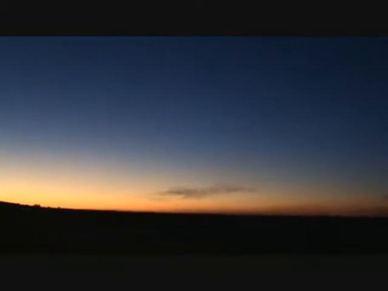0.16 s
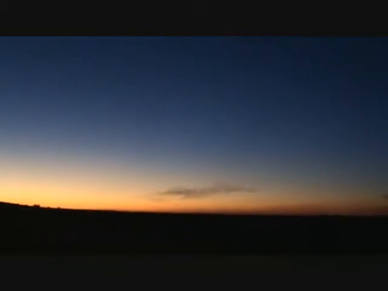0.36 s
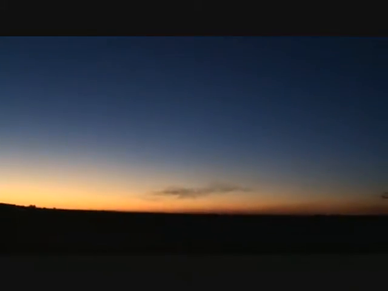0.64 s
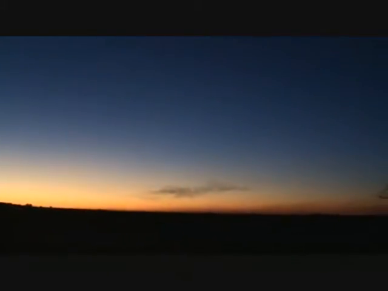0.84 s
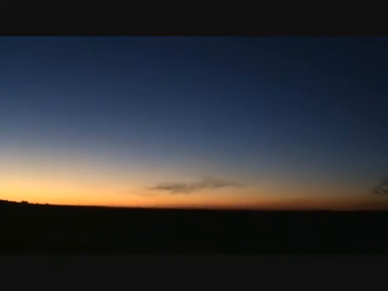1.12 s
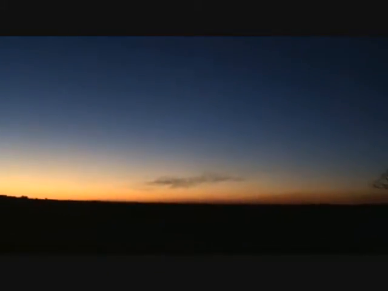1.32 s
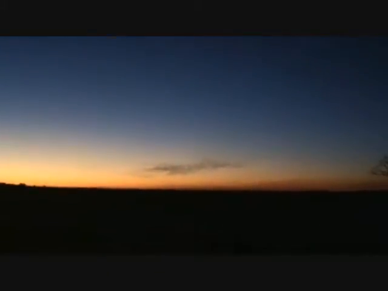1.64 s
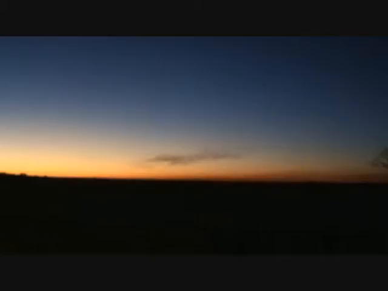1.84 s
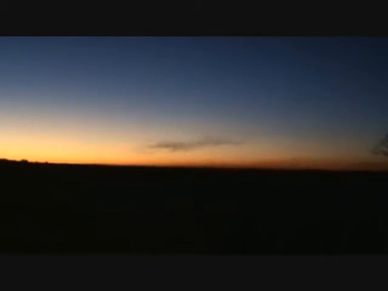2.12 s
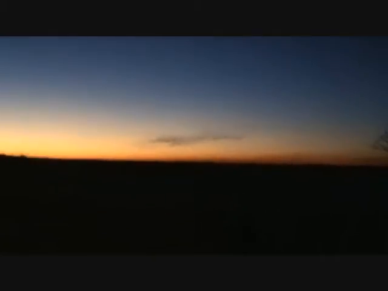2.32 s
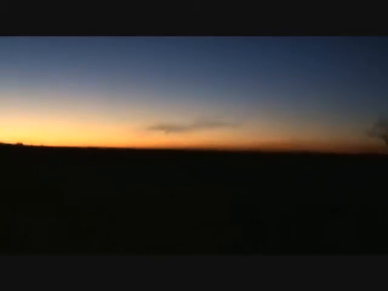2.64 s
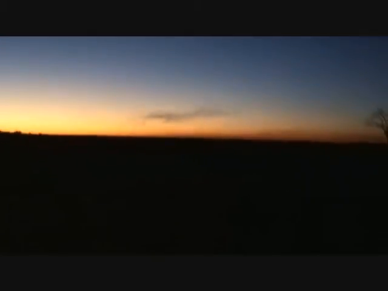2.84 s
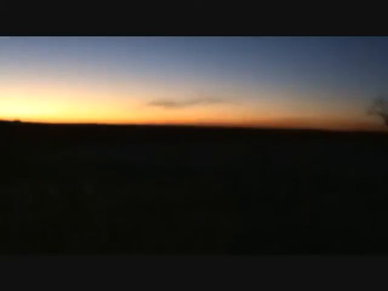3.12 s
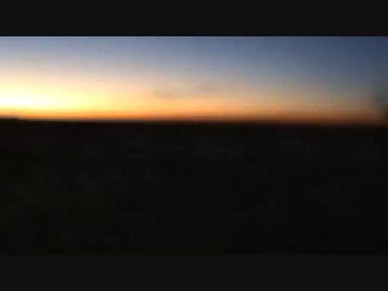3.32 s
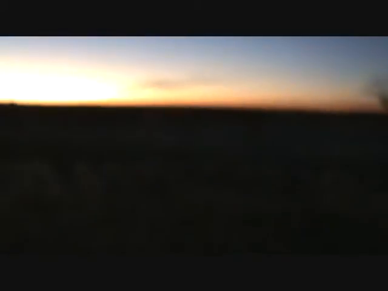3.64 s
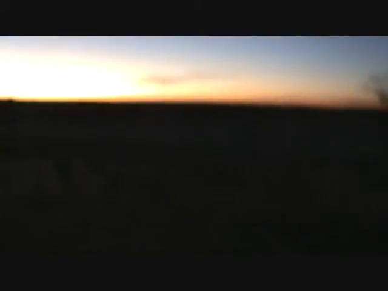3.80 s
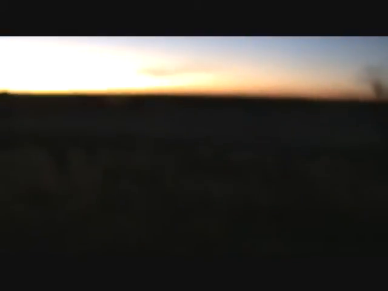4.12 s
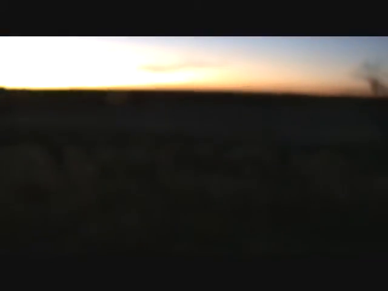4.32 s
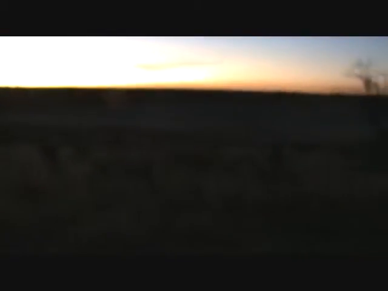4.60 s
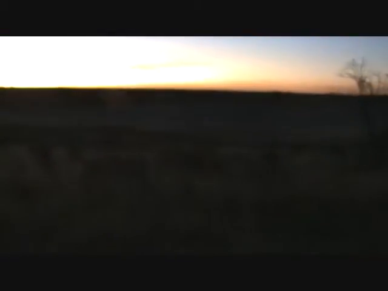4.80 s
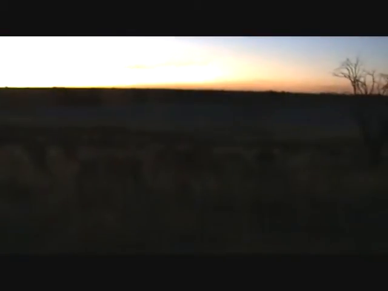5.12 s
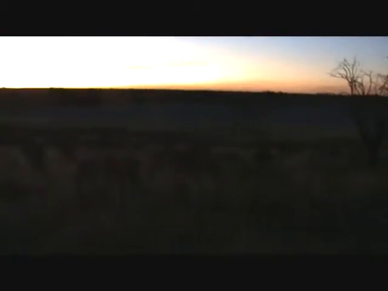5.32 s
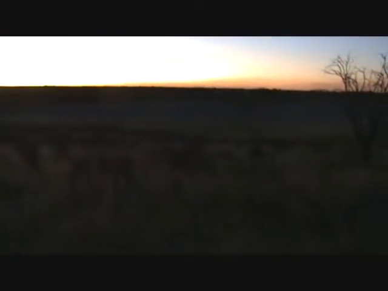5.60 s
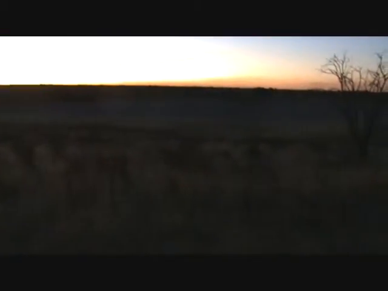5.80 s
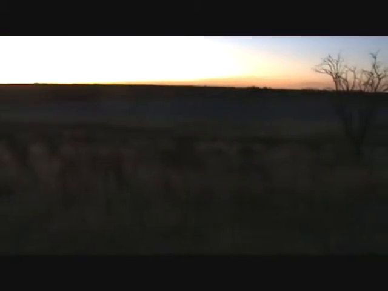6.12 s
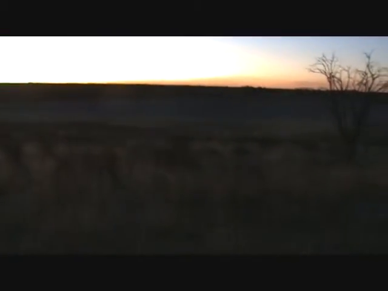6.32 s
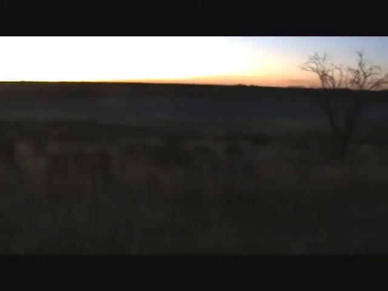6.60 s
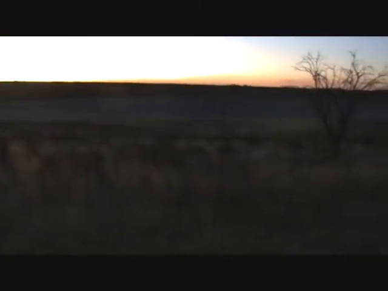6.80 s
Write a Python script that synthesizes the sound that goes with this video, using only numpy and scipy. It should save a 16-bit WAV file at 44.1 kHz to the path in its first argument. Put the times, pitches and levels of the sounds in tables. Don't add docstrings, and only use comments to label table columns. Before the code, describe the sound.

Dry, hard clicking barks of several geckos repeat at about five per second, near and far, with thin crickets, soft air and small camera handling bumps.

```python
import sys
import numpy as np
from scipy import signal
from scipy.fft import rfft, irfft
from scipy.io import wavfile
from scipy.ndimage import uniform_filter1d

SR = 44100
rng = np.random.default_rng(int(sys.argv[2]) if len(sys.argv) > 2 else 0)


def how_loud(loudness_db):
    steps = np.asarray(loudness_db, float) / 20
    return 10 ** steps


def wav_out(sig):
    wavfile.write(sys.argv[1], SR, np.round(np.clip(np.atleast_2d(sig).T, -1, 1) * 32767).astype(np.int16))


N = 306495
SIZE = 8192
HZ = np.fft.rfftfreq(SIZE, 1 / SR)
SCENE_HZ = np.fft.rfftfreq(N, 1 / SR)
T = np.arange(N) / SR
CASE_PAN_DB = 0.5


def on_log_hz(table, hz):
    table_hz, values = np.transpose(table)
    return np.interp(np.log(hz + 1), np.log(table_hz), values)


def level(x, db):
    return x * how_loud(db) / np.sqrt(np.mean(x ** 2))


def pan(db):
    return how_loud(np.array([[db], [-db]]) / 2)


def walk(rate_hz):
    k = int(SR / rate_hz)
    steps = np.repeat(rng.standard_normal(N // k + 1), k)
    return 1.4 * uniform_filter1d(uniform_filter1d(steps, k), k)[:N]


def swells(rows):
    return sum(db * np.exp(-((T - s) / half_s) ** 2) for s, half_s, db in rows)


def resonances(modes, hz):
    s = 1j * hz
    return sum(how_loud(db) * w * s / (f * f + w * s + s * s) for f, w, db in modes)


def add(out, sound, start_s):
    i = int(start_s * SR)
    trimmed = sound * (np.arange(SIZE) < SIZE - 400)
    out[:, i:i + SIZE] += trimmed[:, :N - i]


# f/Hz, density/dB
AIR = [(24, -17.5), (32, -15.5), (60, -7), (250, -6), (430, -4), (680, -9), (1000, -5), (1600, -8),
       (2600, -11.5), (5000, -20.5), (7000, -16.5), (10000, -21), (15800, -24), (16300, -58.5)]
# f/Hz, correlation/1
AIR_ALIKE = [(30, 0.9), (60, 0.997), (125, 0.792), (300, 0.758), (500, -0.014), (1000, -0.233),
             (3000, -0.15), (8000, 0.11), (12000, 0.39), (16000, 1)]
# middle t/s, half length/s, rise/dB
GUSTS = [(1.04, 0.129, 3.5), (2.198, 0.338, 4.5), (2.877, 0.2, 2), (4.72, 0.106, 3.5), (5.15, 0.11, 4),
         (3.406, 0.18, 2), (4.083, 0.217, 3.5), (2.578, 0.099, 3), (6.65, 0.06, 3.5), (0.784, 0.071, 2)]
# t/s, rise/dB
BRUSHES = [
    (3.25, 5),
    (3.39, 7.5),
    (4.49, 7),
    (5.44, 8),
    (6.04, 6.5),
    (6.29, 2),
]


def air():
    alike = np.clip(on_log_hz(AIR_ALIKE, SCENE_HZ), -.5, .999)
    noise = rfft(rng.standard_normal((2, N))) * how_loud(on_log_hz(AIR, SCENE_HZ))
    mid, side = noise * np.sqrt([1 + alike, 1 - alike])
    both = np.array([mid + side, mid - side])
    low = 1 / (1 + (SCENE_HZ / 750) ** 4) / (1 + (60 / (SCENE_HZ + 1)) ** 4)
    brush_s = 0.035
    brushes_db = swells([(s, brush_s, db) for s, db in BRUSHES])
    gusts = how_loud(swells(GUSTS) + brushes_db - 2.0 + walk(20))
    return level(irfft(both * low, N) * gusts + irfft(both * (1 - low), N), -54)


# f/Hz, rms level/dB
HUM = [
    (32.3, -75),
    (107.7, -77),
    (1239.5, -68),
    (15625, -86),
]


def hum():
    tones = sum(np.sqrt(2) * how_loud(db + 2.0 * walk(6.5)) * np.sin(2 * np.pi * f * T) for f, db in HUM)
    return tones * pan(CASE_PAN_DB)


CRICKET_SONGS = [
    (8070, 134.7),
    (7850, 126.8),
]
# middle t/s, half length/s, rise/dB
HIGH_SWELLS = [(0.0, 0.93, 9.5), (1.33, 0.32, 13.5), (3.0, 0.197, 9), (3.52, 0.433, 15.5),
               (4.37, 0.435, 16.5), (5.6, 0.23, 14.5), (6.75, 0.57, 13)]
LOW_SWELLS = [(0.3, 0.5, 4.1), (1.45, 0.8, 11.4), (3.15, 0.2, 7.9), (4.4, 0.47, 9.6), (5.5, 0.653, 12.75),
              (6.8, 0.86, 11)]
SOFT_TRILL_DB = [-77.5, -75.5]


def crickets():
    out = 0
    for k, (wing_hz, rate_hz) in enumerate(CRICKET_SONGS):
        stroke = np.cumsum(rate_hz * (1 + .002 * walk(3))) / SR
        burst = np.exp(-((stroke % 1 - .5) / .2) ** 2) * how_loud(1.2 * walk(120))
        wing = 2 * np.pi * np.cumsum(wing_hz * (1 + 0.012 * walk(300))) / SR
        trill_db = SOFT_TRILL_DB[k] + swells((HIGH_SWELLS, LOW_SWELLS)[k]) - 3.0
        out = out + pan(1.5 - 1.1 * k) * level(burst * np.sin(wing), 0) * how_loud(trill_db)
    return out


def throat_ring(throat, stretch=1):
    colour_db = uniform_filter1d(on_log_hz(throat, HZ / stretch), size=20)
    cepstrum = irfft(np.log(how_loud(colour_db)))
    cepstrum[1:SIZE // 2] *= 2
    cepstrum[SIZE // 2 + 1:] = 0
    ring = np.exp(rfft(cepstrum))
    return ring / np.abs(signal.hilbert(irfft(ring))).max()


def breathy(ring, puff_ms=8.5, hiss_hz=7800, hiss_db=2.5):
    puff = rng.standard_normal(SIZE) * np.exp(-np.arange(SIZE) / SR * 1000 / puff_ms)
    high = 1 / (1 + (hiss_hz / (HZ + 1)) ** 8)
    hiss = how_loud(hiss_db) * rfft(puff) / np.sqrt(np.sum(puff ** 2))
    return ring * (1 - high + high * hiss)


def grass(scatter_db, t60_s, late_db=-20, late_t60_s=0.142, apart=0.776, rise_s=0.0085):
    t = np.arange(SIZE) / SR
    rise = 1 - np.exp(-(t / rise_s) ** 2)
    fall = how_loud(-60 * t / t60_s) + how_loud(late_db - 60 * t / late_t60_s)
    noise = rng.standard_normal((3, SIZE))
    echoes = (noise[0] + apart * noise[1:]) * rise * fall * (t < .13)
    return 1 + how_loud(scatter_db) * rfft(echoes) * resonances([(3700, 130000, 0.0096)], HZ)


def ports(pan_db):
    lag_us_per_db = 2
    lead_s = np.array([[1], [-1]]) * pan_db * lag_us_per_db / 2e6
    grille = 1 - 2 * resonances([(4400, 4200, 0)], HZ)
    return grille * pan(pan_db) * np.exp(2j * np.pi * HZ * lead_s)


def bark(peak_db, gaps_ms, fade_ms, ring, path, jitter, dulling_db=0.45, bloom_db=0.1019, loose_from=0):
    gap_chance, size_chance = rng.standard_normal((2, len(gaps_ms) + 1))
    looseness = jitter * np.linspace(loose_from, 1, len(gaps_ms))
    ms = np.r_[0, np.cumsum(gaps_ms * (1 + looseness * gap_chance[1:]))]
    fade_squareness = 2.27
    size = np.exp(-(ms / fade_ms) ** fade_squareness) * how_loud(.6 * size_chance)
    khz = HZ / 1000 - 4
    tilt_db = -dulling_db * np.maximum(khz, 0) + bloom_db * np.maximum(-khz, 0)
    colour = how_loud(np.outer(ms, tilt_db))
    clicks = size @ (colour * np.exp(-2j * np.pi * np.outer(ms / 1000, HZ)))
    heard = clicks * breathy(ring) * path
    effort = np.linalg.norm(ring) * np.linalg.norm(size)
    return how_loud(peak_db) * irfft(heard) * effort / np.linalg.norm(heard.mean(axis=0))


# f/Hz, level/dB
FAR_THROAT = [(400, -65), (1500, -16), (2200, -14), (3000, -11), (4000, 0), (5000, -10.5), (6000, -20.5),
              (7500, -31), (16000, -84.5)]


def far_bark(db, hz, pan_db, gap_ms, fade_ms, scatter_db, narrowing):
    throat = [(f, narrowing * colour_db) for f, colour_db in FAR_THROAT]
    ring = throat_ring(throat, hz / 4000)
    path = grass(scatter_db, 0.086, rise_s=0.00416) * ports(pan_db)
    return bark(db, np.full(14, gap_ms), fade_ms, ring, path, jitter=.16, loose_from=0.59)


# t/s, level/dB
CHORUS_DB = [(0.0, -56), (0.71, -59), (1.55, -52.5), (2.63, -56.5), (3.58, -55.5), (3.95, -58),
             (4.8, -60.5), (4.99, -49.5), (5.28, -59), (5.4, -57), (6.35, -60), (6.52, -49.5), (6.95, -56)]


def chorus():
    out = np.zeros((2, N))
    barks_per_s = 220
    voices = [far_bark(0, 3800 + 900 * a, 12 * side - 6, 2.1 + b, 28.1, -1.6, 0.985)
              for a, b, side in rng.random((40, 3))]
    for k, (when, size) in enumerate(rng.random((int(barks_per_s * N / SR), 2))):
        add(out, how_loud(3.9 * size) * voices[k % 40], when * N / SR)
    t_s, db = np.transpose(CHORUS_DB)
    return level(out, 0) * how_loud(np.interp(T, t_s, db) + 0.41)


# f/Hz, width/Hz, rms level/dB
TICK_RING = [
    (721, 93, -77.5),
    (1032.4, 143, -65.5),
    (1204, 223, -72),
]


def motor():
    tick_rate_hz, left_db = 33.5, 5.5
    ticks = np.zeros(N)
    at = (np.arange(.012, N / SR - .01, 1 / tick_rate_hz) * SR).astype(int)
    ticks[at] = how_loud(0.5 * rng.standard_normal(len(at)))
    struck = rfft(ticks)
    rings = sum(level(irfft(struck * resonances([(f, w, 0)], SCENE_HZ) ** 2, N), db) for f, w, db in TICK_RING)
    return rings * pan(left_db + CASE_PAN_DB)


# (t/s, peak/dB)
FAR_BOUTS = [
    ((4295, -3, 2.2, 32), [(0.161, -33), (0.4025, -37)]),
    ((4220, 3.9, 2.85, 30.6), [(0.6205, -38), (0.8435, -40), (1.0505, -37.5), (1.284, -41.5), (1.5094, -42), (1.7524, -43)]),
    ((4170, 5.6, 2.52, 19), [(0.0248, -54), (0.7194, -38.5), (0.945, -34), (1.1687, -41)]),
    ((4280, -4.5, 3, 15), [(1.8233, -26.5), (2.0276, -28), (2.2583, -28.5), (2.5172, -29)]),
    ((4490, 3.4, 2.16, 9.6), [(1.9325, -29.5), (2.1974, -27.5), (2.4603, -29.5), (2.7621, -29.5)]),
    ((3837.5, -2.5, 2, 29.5), [(1.8494, -37), (2.0894, -41.5), (2.3351, -41), (2.5855, -43), (2.835, -38.5), (3.0809, -42)]),
             ((4210, 5.1, 2.49, 3.15), [(2.9871, -28.5), (3.1517, -29.5), (3.3233, -30), (3.494, -28.5), (3.6735, -29.5), (3.8487, -46.5), (4.0168, -30)]),
    ((4840, 3, 2.49, 14.1), [(2.9507, -39.5), (3.189, -42), (3.3887, -37), (3.6351, -38), (3.7094, -41.5), (3.8866, -37), (4.145, -43), (4.1739, -37), (4.4328, -44)]),
    ((3870, 3.6, 2.86, 8.9), [(3.2939, -44), (3.375, -42), (3.465, -41.5), (3.5748, -37), (3.745, -37), (3.7933, -40), (3.9774, -41)]),
    ((4328.5, -2.5, 2.5, 22), [(4.2438, -32), (4.4648, -32), (4.6902, -34), (4.897, -35.5)]),
    ((4900.5, -1.5, 1.5, 15), [(4.555, -32), (4.803, -35), (5.0844, -33), (5.5344, -43)]),
             ((4070, 0.46, 2.57, 7), [(4.7594, -28), (4.9621, -24.5), (5.1654, -27), (5.1911, -23), (5.422, -20.5), (5.6027, -36.5)]),
    ((3897, -3.5, 5, 1.5), [(5.2894, -29.5), (5.4894, -28), (5.7094, -58), (5.8994, -46)]),
    ((4250.5, -4, 1, 34.5), [(6.3844, -36.5), (6.5994, -40), (6.8164, -40.5)]),
    ((4220, 0.5, 1, 32.5), [(6.4298, -36), (6.6328, -36.5), (6.8372, -35)]),
    ((4300, 6.8, 1.4, 12.4), [(6.1615, -32.5), (6.4024, -32), (6.653, -33), (6.9027, -32.5)]),
]


def distant():
    out = np.zeros((2, N))
    for (hz, pan_db, gap_ms, fade_ms), barks in FAR_BOUTS:
        for s, db in barks:
            narrowing = np.clip(.9 - 0.074 * (db + 30.5), .7, 1.6)
            add(out, far_bark(db + 0.9, hz, pan_db, gap_ms, fade_ms, -19.5, narrowing), s)
    return out


def burrow(late_ms, echo_db):
    delay = np.exp(-2j * np.pi * HZ * late_ms / 1000)
    return 1 + how_loud(echo_db) * resonances([(3200, 8400, 0.0014)], HZ) * delay


# t/s, peak/dB, first click gap/ms, second gap/ms, later gaps/ms
AHEAD = [(0.2332, -11.1, 2.49, 2.72, 2.31), (0.4388, -11.9, 3.22, 3.27, 2.57),
         (0.654, -11.8, 3.11, 3.11, 2.62), (0.8721, -11.3, 3.13, 3.13, 2.62),
         (1.0934, -12.0, 3.11, 3.06, 2.65), (1.3301, -12.2, 3.06, 3.06, 2.62),
         (1.5978, -12.6, 3.11, 3.06, 2.56)]
LEFT = [(5.0257, -10.0, 1.6, 1.85, 2.07), (5.2317, -10.7, 2.09, 2.8, 2.62),
        (5.432, -10.8, 2.54, 2.72, 2.62), (5.6362, -10.8, 2.4, 3.2, 2.72), (5.8386, -11.0, 2.36, 3.1, 2.7),
        (6.0408, -11.0, 2.45, 3.12, 2.75), (6.2528, -10.9, 2.4, 3.13, 2.74),
        (6.4798, -10.9, 2.38, 3.08, 2.65)]
MIDDLE = [(4.3104, -21.7, 1.54, 1.77, 1.77), (4.5111, -20.9, 1.8, 1.95, 1.92),
          (4.7127, -20.7, 1.97, 2.15, 2.05), (4.9182, -20.8, 1.99, 2.15, 2.06),
          (5.129, -22.9, 2.02, 2.18, 2.06), (5.3566, -21.9, 2.0, 2.15, 2.08)]
RIGHT_FAR = [(1.4355, -32.9, 1.63, 1.81, 1.87), (1.6629, -31.0, 1.88, 2.15, 2.16),
             (1.891, -30.8, 2.02, 2.31, 2.32), (2.1267, -32.3, 2.04, 2.29, 2.35),
             (2.3946, -33.6, 2.11, 2.31, 2.37), (2.6236, -33.4, 2.13, 2.22, 2.27),
             (2.8105, -34.0, 2.06, 2.37, 2.3), (3.0092, -32.8, 2.22, 2.43, 2.46),
             (3.2161, -32.3, 2.24, 2.43, 2.41), (3.4356, -31.6, 2.34, 2.54, 2.59)]
RIGHT_LATE = [(6.1698, -29.2, 2.2, 2.52, 2.43), (6.3552, -30.5, 2.99, 3.04, 2.83),
              (6.542, -30.1, 3.06, 3.15, 2.73), (6.7332, -30.3, 3.2, 3.27, 2.9),
              (6.934, -30, 3.2, 3.25, 2.9)]
# f/Hz, level/dB
AHEAD_THROAT = [(400, -42.5), (900, -27), (1400, -26), (2100, -15), (2550, -21), (2950, -14.5),
                (4000, -4.5), (4660, -2.5), (4790, 7), (4920, -2), (6200, -10.5), (8000, -26),
                (10500, -37.5), (12500, -57.5)]
LEFT_THROAT = [(400, -31.5), (1200, -21.5), (1700, -11), (2300, -9), (2700, -7.5), (3150, 1), (3450, -0.5),
               (4150, 12.5), (4900, -6), (5550, -3.5), (6400, -8.5), (6950, -16), (10300, -31.5),
               (12500, -48.5)]
MIDDLE_THROAT = [(400, -29), (1500, -9), (1900, -10.5), (2600, -1.5), (3050, -5), (3750, 7.5), (4300, 13),
                 (5100, -7.5), (5600, -7.5), (6500, -11.5), (8200, -22.5), (10000, -26.5), (11500, -54.5)]
RIGHT_THROAT = [(400, -30.5), (1500, -11.5), (2200, -2.5), (3000, 3), (3850, 10), (4650, -0.5),
                (5000, -6.5), (6000, -10), (7500, -19), (16000, -41.5)]
LATE_THROAT = [(400, -44.5), (1200, -17), (2200, -3), (2800, -4.5), (3300, -1.5), (3850, 10.5),
               (4500, -14.5), (5500, -11.5), (7000, -52.5), (16000, -96)]
# barks, throat, gain/dB, fade/ms, scatter/dB, scatter t60/s, share of fade lost per bark/1
CALLERS = [(AHEAD, AHEAD_THROAT, 1.46, 22.82, -14, 0.0334, 0.0063),
           (LEFT, LEFT_THROAT, 1.315, 19.98, -13, 0.0268, 0.0158),
           (MIDDLE, MIDDLE_THROAT, 0.0, 21.47, -11.5, 0.0308, 0.0295),
           (RIGHT_FAR, RIGHT_THROAT, 1, 25.5, -18, 0.049, 0.0655),
           (RIGHT_LATE, LATE_THROAT, -0.12, 20.9, -17.5, 0.039, 0.016)]
CALLER_PANS_DB = [-1.2, 6.6, -1.5, -4.8, -6.3]
HABITS = [(-.012, .06, 0), (.01, .05, .05), (.022, .055, 0), (0, .13, 0), (-.005, .06, 0)]
# treble lost/(dB/ms/kHz), bass gained/(dB/ms/kHz)
TILTS_DB = [(0.184, 0.114), (0.086, 0.1217), (0.138, 0.103), (.03, .01), (.03, 0.0104)]
# delay/ms, level/dB
BURROW_ECHOES = [(1.5, -14.5), (1.629, -17.5), (1.495, -30.5), (1.69, -23), (1.755, -17.5)]


def callers():
    out = np.zeros((2, N))
    echo_pan_share = 0.277
    settle = .5
    for caller, pan_db, habit, tilt, echo in zip(CALLERS, CALLER_PANS_DB, HABITS, TILTS_DB, BURROW_ECHOES):
        barks, throat, gain_db, fade_ms, scatter_db, t60_s, tiring = caller
        drift, jitter, flat = habit
        place = grass(scatter_db, t60_s)
        for k, (s, db, first, second, later) in enumerate(barks):
            steady = later * (1 + drift * np.arange(14))
            early = (second - later) * settle ** np.arange(2, 16)
            gaps_ms = np.r_[first, second, (second + later) / 2, steady + early]
            scatter = (place + grass(scatter_db, t60_s)) / 2 - 1
            path = ports(pan_db) + scatter * ports(echo_pan_share * pan_db)
            ring = throat_ring(throat, 1 - flat * np.exp(-k / 2)) * burrow(*echo)
            tired_ms = fade_ms * (1.08 - tiring * k)
            add(out, bark(db + gain_db + 1.5, gaps_ms, tired_ms, ring, path, jitter, *tilt), s)
    return out


# t/s, f/Hz, length/ms, level/dB
BUMPS = [(3.225, 160, 19.8, -49.5), (3.38, 135, 41, -48.5), (3.385, 842, 15, -49), (4.5, 586, 15, -60),
         (3.4, 830, 16.5, -55.5), (4.474, 144.7, 15.4, -50), (4.5077, 3200, 0.78, -35),
         (5.55, 804, 20.7, -65), (5.7512, 918, 6, -31), (5.751, 1600, 5.5, -47.5),
         (5.751, 6120, 1.22, -41.5), (5.751, 9300, 0.7, -47.5), (5.751, 2000, 4, -48.5),
         (3.392, 960, 13.8, -57.5), (3.9, 520, 20, -59), (1.846, 2470, 2, -43), (5.76, 888, 7.8, -49.5),
         (1.845, 1620, 1.05, -35.5), (1.845, 6630, 3.25, -43), (6.274, 101.3, 38, -52.5)]
# t/s, f/Hz, length/ms, level/dB
SIDE_TAP = (4, 1100, 0.3, -44)


def bumps():
    thuds = np.zeros(N)
    for s, f, ms, db in BUMPS:
        swell = np.sin(np.pi * np.clip((T - s) * 1000 / ms, 0, 1))
        thuds += how_loud(db) * swell * np.sin(2 * np.pi * f * (T - s))
    s, f, ms, db = SIDE_TAP
    tap = how_loud(db) * np.exp(-((T - s) * 1000 / ms) ** 2) * np.sin(2 * np.pi * f * (T - s))
    return thuds * pan(CASE_PAN_DB) + tap * np.array([[1], [-1]])


SQUEAKS = [
    (3.065, 3.19, 6403, -64),
    (3.113, 3.225, 3200, -59.5),
    (3.381, 3.439, 5220, -60.5),
    (3.45, 3.532, 5220, -60.5),
]


def squeaks():
    out = np.zeros(N)
    for start, end, f, db in SQUEAKS:
        gate = np.clip(np.minimum(T - start, end - T) / 0.0095, 0, 1)
        tone = np.sin(2 * np.pi * f * T + 1.35 * walk(60))
        out += np.sqrt(2) * how_loud(db + 2.47 * walk(50.2)) * gate * tone
    return out * pan(CASE_PAN_DB)


def scene():
    camera = hum() + motor() + bumps() + squeaks()
    return air() + crickets() + chorus() + distant() + callers() + camera


def treble_dropouts(x):
    from_hz, loud_db, share, spared_db, depth_db = 10900, -27, .45, 1., -40
    hz, _, frames = signal.stft(x, SR, nperseg=1024)
    loud = 10 * np.log10(np.sum(np.abs(frames) ** 2, axis=(0, 1)) + 1e-12) > loud_db
    luck = rng.random((40, len(loud)))[(hz // 700).astype(int)]
    luck = luck.repeat(2, axis=1)[:, :len(loud)]
    gain_db = np.where(luck > share, spared_db, depth_db)
    kept = how_loud(gain_db * (loud & (hz[:, None] > from_hz)))
    return signal.istft(frames * kept, SR, nperseg=1024)[1][:, :N]


def band_limit(x):
    return signal.sosfilt(signal.butter(12, 16060, fs=SR, output="sos"), x)


def record(dry):
    top_hz = 15760
    lowpass = signal.ellip(10, .1, 60, top_hz, fs=SR, output="sos")
    mix = signal.sosfiltfilt(lowpass, treble_dropouts(dry))
    return band_limit(mix)


dry = scene()
out = record(dry)
wav_out(out)
```